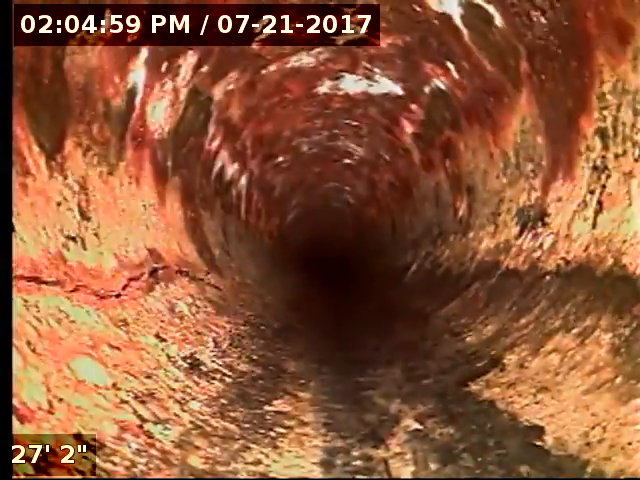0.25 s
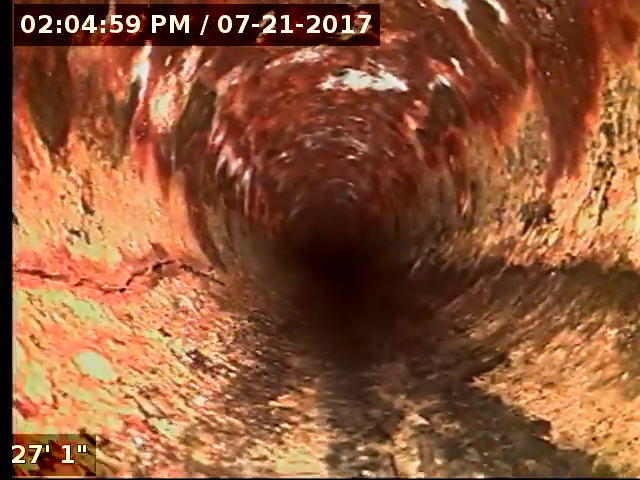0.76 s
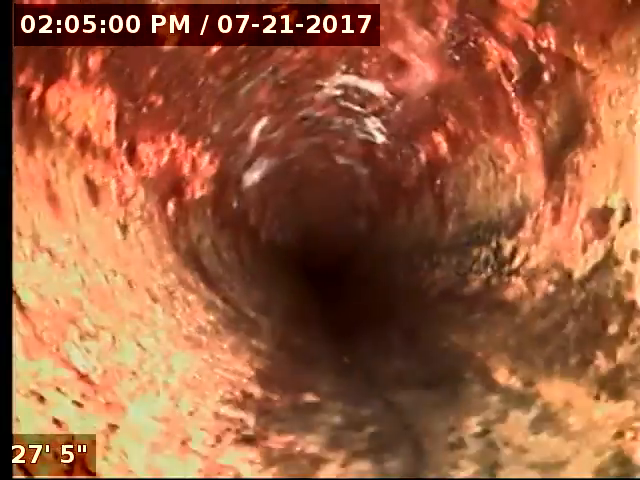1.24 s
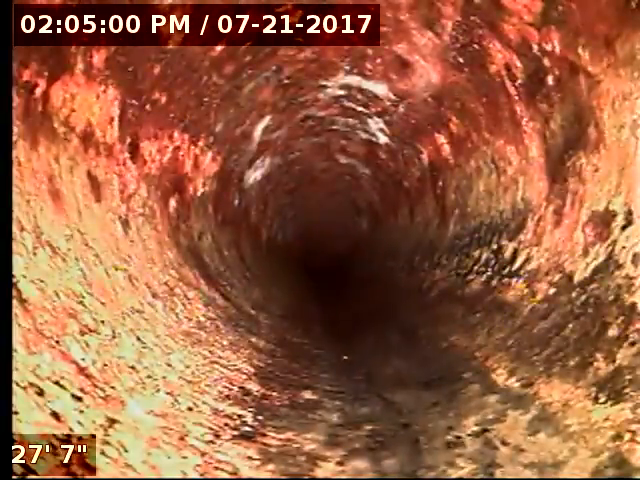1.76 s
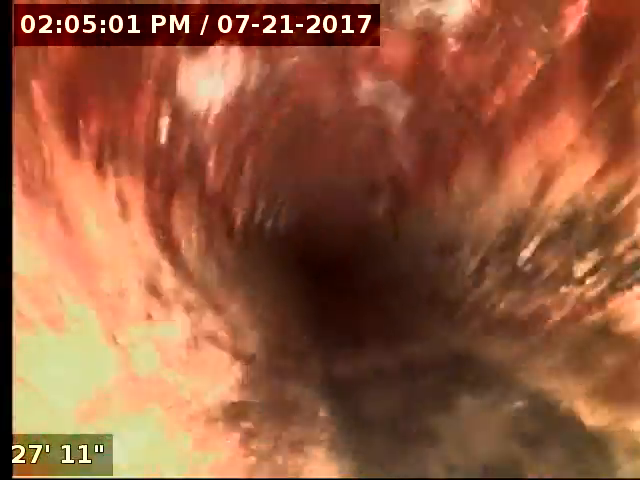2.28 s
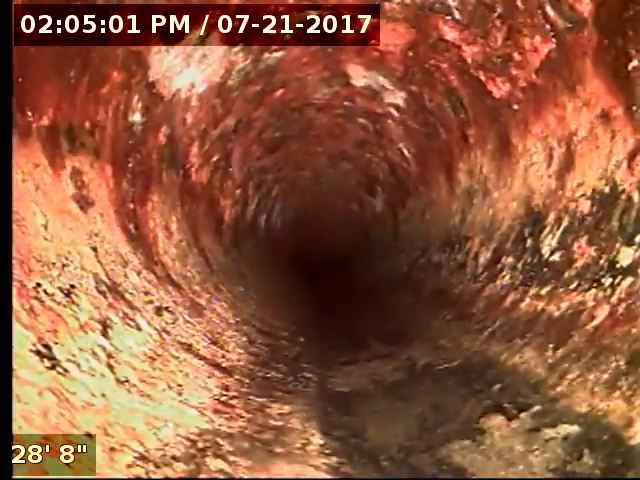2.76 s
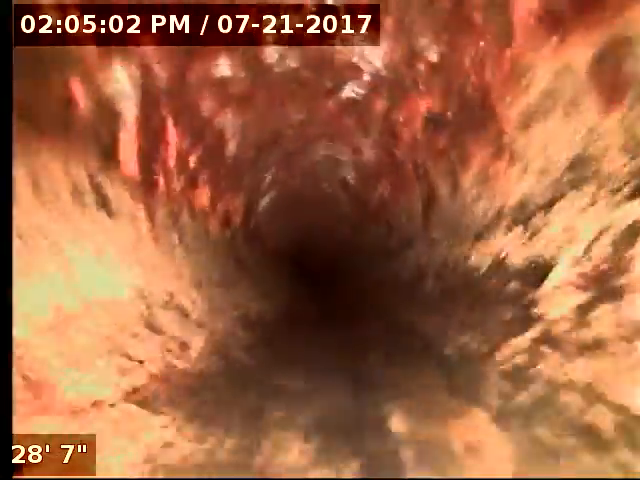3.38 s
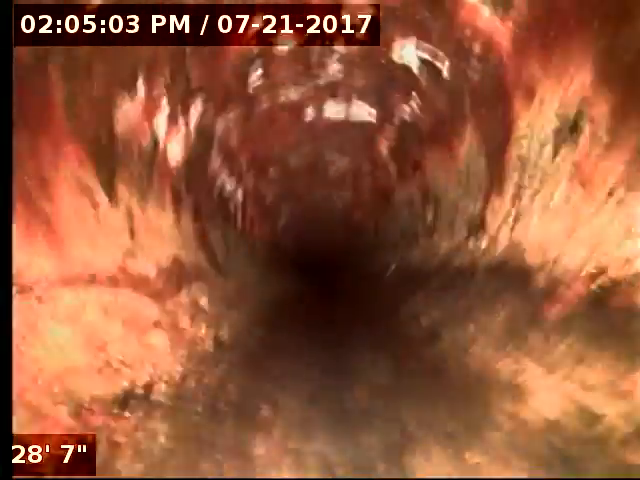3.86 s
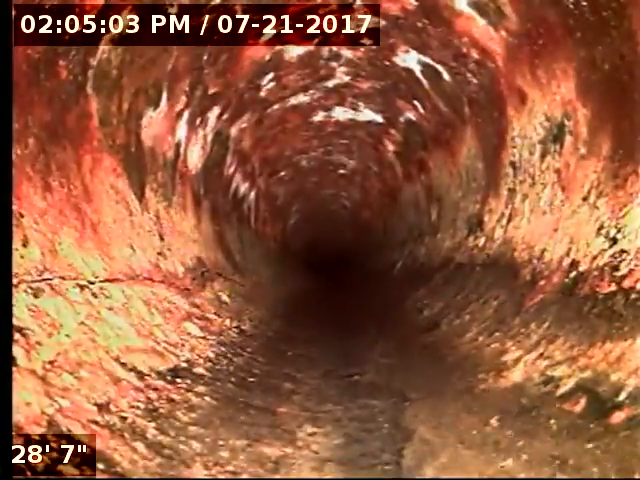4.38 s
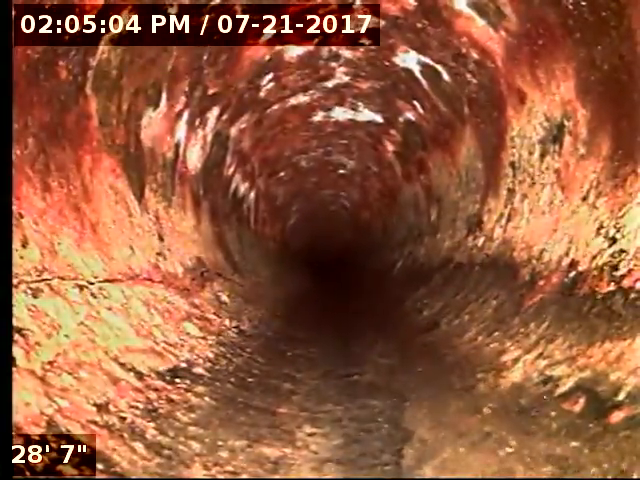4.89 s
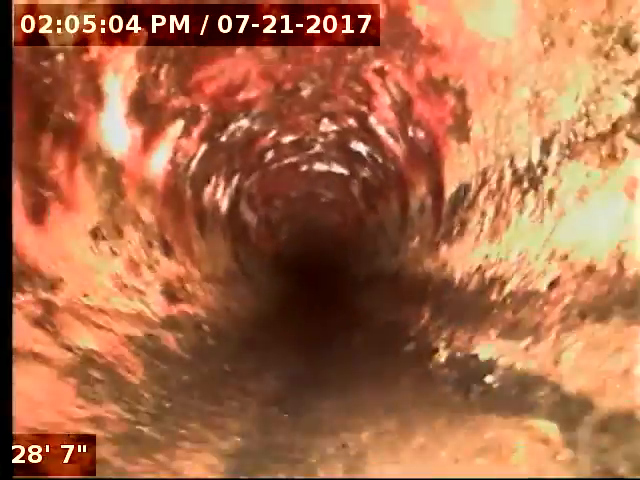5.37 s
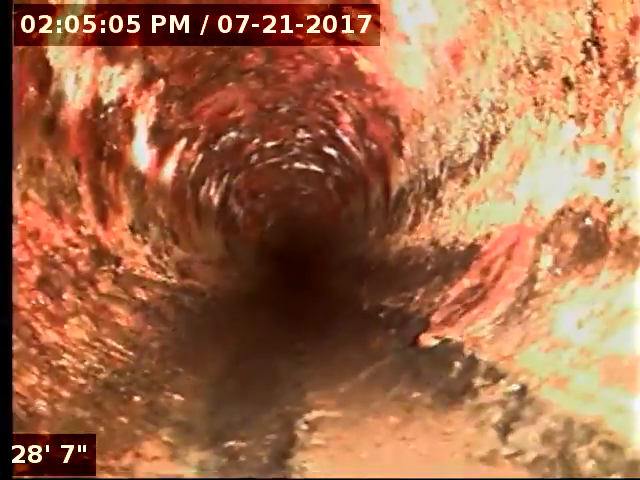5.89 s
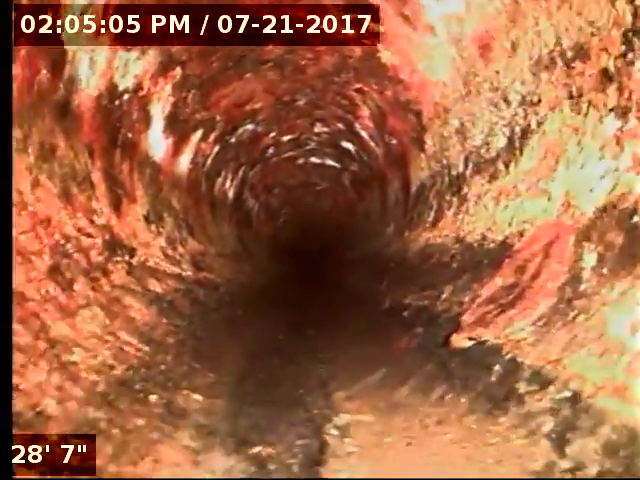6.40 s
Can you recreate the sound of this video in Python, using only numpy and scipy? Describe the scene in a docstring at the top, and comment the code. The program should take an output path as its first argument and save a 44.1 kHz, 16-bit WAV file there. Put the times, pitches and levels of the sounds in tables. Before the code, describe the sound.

A push cable is fed by hand into a drain, scraping, knocking and ticking in its reel over a faint hum.

```python
"""Feeding a push cable into a drain

At the drain, on the inspection unit's own small microphone, in mono. Pushed by hand, the cable scrapes,
knocks and chatters in its reel, thumps the frame, ticks on the wire cage and once snaps taut. Between
pushes a hand slides back along it with a soft hiss and hoarse squeaks. The unit's housing colours the
knocks and the friction; room air and a faint hum lie underneath."""
import sys
import numpy as np
from scipy import signal
from scipy.fft import rfft, irfft
from scipy.io import wavfile
from scipy.ndimage import uniform_filter1d

SR = 44100
rng = np.random.default_rng(int(sys.argv[2]) if len(sys.argv) > 2 else 0)


def materialize(psi):
    """Save the field psi as 16-bit PCM at rate SR to the path in sys.argv[1].

    A 1-D psi becomes a single channel; in a 2-D psi each row is a channel.
    """
    bounded = np.clip(np.atleast_2d(psi).T, -1, 1)
    quanta = np.round(bounded * 32767).astype(np.int16)
    wavfile.write(sys.argv[1], SR, quanta)


N = 292824
TIME, HIT_TIME = np.arange(N) / SR, np.arange(SR // 3) / SR
LEAD_S = .03  # room for the scuff ahead of a blow

# resonances of the housing around the microphone: (frequency [Hz], width [Hz], boost [dB])
HOUSING_MODES = [(204.6, 28, 18.5), (293, 30, -4), (402, 144, 8), (667, 200, 3.5), (776, 40, 7),
                 (869, 100, 5), (1142, 110, 6.5), (1460, 46, 7.5), (1723, 82, 11.5), (1970, 27, 2),
                 (2102, 130, 6), (2554, 42, 6)]
# tone of each source ahead of the housing: (frequency [Hz], relative level [dB])
AIR_SPECTRUM = [(25, -7), (60, -3.5), (120, 1.5), (200, 4), (300, 4), (520, -4), (800, -25), (1300, -6.5),
                (2000, -12.5), (3000, -15), (4500, -25.5), (7000, -20), (8000, -32.5), (8900, -54)]
SCRAPE_SPECTRUM = [(60, -33.5), (150, -3.5), (280, -8), (500, -12), (660, 1.5), (850, 0), (1000, -4),
                   (1400, -5), (1700, -14.5), (2800, -13.5), (3600, -31.5), (6000, -32.5), (9000, -55.5)]
KNOCK_BODY_SPECTRUM = [(40, -19), (150, -23.5), (300, -6), (480, -11), (660, 4), (850, -2.5), (1000, -2),
                       (1500, -3.5), (1900, -41), (3500, -42.5), (9000, -94.5)]
KNOCK_EDGE_SPECTRUM = [(300, -26.5), (1200, -5.5), (1900, 13), (2900, 6), (3500, -3.5), (5000, -17),
                       (7000, -15), (9000, -69.5)]
PALM_SPECTRUM = [(200, -23.5), (700, -11.5), (1600, 1.5), (2400, 6), (3200, 8), (3700, -0.5), (4600, -13),
                 (9000, -56.5)]
FIZZ_SPECTRUM = [(2500, -32), (4400, 4.5), (5200, 2), (5900, 4.5), (7000, 0), (7700, -6), (8800, -20.5),
                 (10000, -45)]
CAGE_SPECTRUM = [(300, 2.5), (1200, 4.5), (2000, 6), (2600, 8.5), (3050, -31.5), (3500, 1.5), (4500, -29),
                 (9000, -62.5)]
SNAP_SPECTRUM = [(30, -22), (200, 8.5), (500, -1), (900, 5.5), (1400, -12), (2400, -15), (3400, -31),
                 (6000, -60), (9000, -70)]
# tones of the unit's hum: (frequency [Hz], level [dB])
HUM_TONES = [(219, -63), (360.7, -68.5), (732, -87), (947.5, -69), (1130, -71.5)]
# pushes on the cable: (start [s], length [s], relative level [dB])
PUSHES = [(-0.05, 0.054, -40.5), (0.68, 0.21, -45.5), (0.864, 0.32, -41.5), (1.43, 0.06, -46),
          (1.966, 0.41, -43), (2.883, 0.45, -39), (3.559, 0.23, -43), (4.058, 0.042, -46),
          (5.128, 0.17, -46), (6.12, 0.051, -41.5), (6.36, 0.45, -47)]
# thumps of the frame: (time [s], level [dB], pitch [Hz], t60 [s])
FRAME_THUMPS = [(0.042, -40, 222, 0.18), (0.217, -41.5, 211.8, 0.3), (0.74, -31.5, 233, 0.072),
                (0.818, -36, 243, 0.17), (1.021, -39.5, 230, 0.12), (1.195, -28.5, 217, 0.15),
                (1.83, -23, 216, 0.17), (1.853, -29.5, 225, 0.11), (1.958, -37.5, 223, 0.18),
                (2.236, -35, 277, 0.13), (2.361, -27, 228, 0.15), (2.375, -33, 306, 0.05),
                (3.053, -33.5, 217.5, 0.23), (4.376, -37, 222, 0.26), (6.036, -55, 75, .12),
                (6.146, -43.5, 216.5, 0.41)]
# cable knocks on the reel:
# (time [s], relative level [dB], edge offset [dB], hollow pitch [Hz], chatter decay [s], scuff [0-1])
REEL_KNOCKS = [(0.078, -35.5, -14, 930, .006, 0.1), (0.296, -52, 10, 960, .003, 0.1),
               (0.634, -32, -7, 700, 0.02, 1), (0.731, -35.5, -9, 740, 0.0098, 0.5),
               (0.785, -30, -10.5, 835, 0.0047, 0.5), (0.820, -25, -16, 844, 0.0047, 0.26),
               (0.921, -32.5, -3.5, 790, 0.0065, 1), (1.191, -25.5, -16.5, 970, 0.0026, 0.05),
               (1.551, -38, -1, 715, 0.004, 1), (1.777, -31.5, -16.5, 820, 0.018, 0.8),
               (1.8245, -24, -5.5, 2190, 0.0012, 0.83), (1.83, -18, -19, 790, .0022, 0.7),
               (1.865, -33.5, -14, 820, 0.042, 1), (2.115, -25, -26, 717, 0.014, 0.3),
               (2.356, -29.5, 9.5, 1020, 0.0034, 0.1), (2.361, -24.5, -29, 885, 0.012, 1),
               (2.882, -30.5, -14, 853, 0.0065, 0.26), (3.029, -37, 5.5, 700, 0.002, 1),
               (3.051, -20, -7.5, 810, 0.0059, 0), (3.058, -24.5, -10, 787, 0.007, 0),
               (3.1255, -27.5, -16, 790, 0.0036, 0.2), (3.148, -29.5, -31, 676, .0085, .5),
               (3.357, -26.5, -14, 707, 0.0026, 1), (3.492, -24.5, -16.5, 690, 0.0018, 0.04),
               (4.112, -29.5, -19, 785, 0.0061, 0.96), (4.148, -31, -25, 875, .018, 1),
               (4.361, -25, -4.5, 812, 0.012, 0.34), (4.928, -34, 1.5, 1780, 0.0086, 0.47),
               (5.038, -24.5, -15, 670, 0.0043, 0.02), (5.046, -27.5, -15.5, 695, 0.011, 0.5),
               (5.117, -22, -34, 730, .002, 1), (5.149, -35, -9.5, 750, 0.0086, 1),
               (5.305, -26.5, -21, 750, 0.0016, 0.1), (6.1463, -23, -15, 810, 0.0026, 0),
               (6.15, -28, -4.5, 1500, 0.0027, 0.17), (6.194, -24.5, -16.5, 780, 0.0049, 0.96),
               (6.228, -36, -22, 770, 0.0034, 0.05)]
# squeaks of the cable's jacket: (middle [s], length [s], level [dB], pitch [Hz], glide [Hz/s])
GRIP_SQUEAKS = [(0.19, 0.13, -55, 2870, 0), (0.35, 0.23, -49, 3450, 4004), (1.08, 0.15, -54, 2400, -3),
                (1.456, 0.23, -56, 3110, -1500), (1.607, .16, -52, 2130, -2000),
                (2.276, 0.08, -51.5, 2560, 3), (2.616, 0.23, -54.5, 3080, -500),
                (4.65, 0.17, -53, 3460, -2000), (4.759, 0.17, -48, 2990, -7000),
                (4.805, 0.2, -51, 1800, -1500)]
# hand strokes along the cable: (start [s], fastest [s], end [s], relative rasp [dB], relative hiss [dB])
HAND_SLIDES = [(0.203, 0.4, 0.63, -47.5, -58.5), (0.86, 1.06, 1.47, -56.5, -83.5),
               (1.3, 1.56, 1.75, -48, -63.5), (2.446, 2.614, 2.954, -50, -71),
               (4.42, 4.702, 4.845, -50.5, -55)]
# thin upper resonances of the sliding grip: (frequency [Hz], width [Hz], relative level [dB])
GRIP_WHISPERS = [(5090, 540, -3.5), (6600, 810, -3.5), (7350, 710, -6.5)]
# ticks on the wire cage: (time [s], level [dB], treble offset [dB], base t60 [s])
CAGE_TICKS = [(0.921, -44, -26, 0.16), (1.19, -48, -4, 0.038), (2.113, -29.5, -17, 0.13),
              (2.357, -20.5, -7, 0.0074), (3.026, -36.5, -15.5, 0.13), (3.052, -36.5, -21, 0.14),
              (3.142, -43.5, -23, 0.22), (3.352, -42, -31, 0.12), (4.36, -41, -17.5, 0.26),
              (4.922, -48, -29, 0.36), (5.109, -34.5, -16, 0.16), (5.299, -43, -20, 0.14)]
# ringing modes of the cage: (frequency [Hz], relative level [dB], ring time [x base t60])
CAGE_MODES = [(1834, 1.5, 2), (2100, 3.5, 0.95), (2450, 2, 1.3), (2830, 4.5, 1.45), (3025, 2.5, 1.6),
              (3096, 4.5, 1.32), (3170, -0.5, 1.5), (5260, -15.5, 1.4), (6470, -14.5, 1.2)]
# pings of a single cage wire: (time [s], level [dB])
WIRE_PINGS = [(1.187, -59.5), (2.357, -49)]
# modes of that wire: (frequency [Hz], relative level [dB], t60 [s])
WIRE_MODES = [(7060, 0, 0.21), (7220, -12, 0.29), (7400, -2, .08)]


def amp(db):
    """Decibels to gain."""
    return 10 ** (np.asarray(db) / 20)


def unit(x):
    """Scales to rms 1."""
    return x / np.sqrt(np.mean(x ** 2) + 1e-20)


def unit_hit(x, size=220):
    """Scales the loudest few milliseconds to rms 1."""
    return x / np.sqrt(uniform_filter1d(x ** 2, size).max() + 1e-20)


def add(mix, s, sound):
    """Mixes a sound in at time s."""
    part = mix[max(round(s * SR), 0):][:len(sound)]
    part += sound[:len(part)]


def drift(rate_hz):
    """Slow random wander of rms 1."""
    hz = np.fft.rfftfreq(N, 1 / SR)
    return unit(irfft(rfft(rng.standard_normal(N)) / (1 + (hz / rate_hz) ** 2) ** 2, N))


def colour(x, spectrum, ring=1, peaks=(), size=8192):
    """Causal filter: a smooth spectrum plus the housing's resonances and further peaks, scaled by ring."""
    hz = abs(np.fft.fftfreq(size, 1 / SR))
    corner_hz, corner_db = np.transpose(spectrum)
    shape_db = np.interp(np.log(hz + 1), np.log(corner_hz), corner_db)
    shape_db += ring * sum(db / (1 + (2 * (hz - f) / width) ** 2)
                           for f, width, db in [*HOUSING_MODES, *peaks])
    minimum_phase = np.exp(np.conj(signal.hilbert(np.log(amp(shape_db)))))
    response = np.fft.ifft(minimum_phase).real
    return signal.fftconvolve(x, response[:size // 2])[:len(x)]


def resonate(x, hz, width_hz):
    """A steep-sided resonance that follows the curve hz."""
    turn = np.exp(2j * np.pi * np.cumsum(hz) / SR)
    r = np.exp(-np.pi * np.sqrt(2) * width_hz / SR)
    return 2 * (turn * signal.lfilter([(1 - r) ** 2], [1, -2 * r, r ** 2], x / turn)).real


def room_tone(air_db=-54, waver_db=5.0, wander_rad=0.94):
    """Room air drones in the housing over the unit's faint, wavering hum."""
    air = amp(air_db) * unit(colour(rng.standard_normal(N), AIR_SPECTRUM, ring=0.45))
    hum = np.zeros(N)
    for hz, db in HUM_TONES:
        gain = amp(db + waver_db * drift(rate_hz=8.3))
        hum += gain * unit(np.sin(2 * np.pi * hz * TIME + wander_rad * drift(rate_hz=0.71)))
    return air + hum


def grains(per_s, spread_db):
    """Tiny random slips of uneven size."""
    size = amp(spread_db * np.minimum(rng.exponential(1, N), 4))
    return unit(size * rng.standard_normal(N) * (rng.random(N) < per_s / SR))


def push(start, length, attack_s=0.064, sag_db_per_s=10.5, coast_db_per_s=49.5):
    """Gain of one push: it gets the cable up to speed, tires a little, then lets the reel coast."""
    t = np.maximum(TIME - start, 0)
    coasting_s = np.maximum(t - length, 0)
    return np.minimum(t / attack_s, 1) * amp(-sag_db_per_s * t - coast_db_per_s * coasting_s)


def hand_speed(start, fastest, end):
    """One stroke, 0-1: the hand speeds up and slows down in a smooth arch."""
    return np.sin(np.pi / 2 * np.interp(TIME, [start, fastest, end], [0, 1, 0]))


def cable_scrape(trim_db=-1, creep_db=-52.5, drag_db=-4.5):
    """Small slips of the cable shake the reel: strongly in a push, faintly under the sliding hand."""
    slips = grains(per_s=4000, spread_db=1.5) * amp(1.4 * drift(rate_hz=35))
    power = amp(creep_db) ** 2  # the cable never quite stops rubbing
    power += sum((amp(db) * push(start, length)) ** 2 for start, length, db in PUSHES)
    power += sum((amp(db + drag_db) * hand_speed(start, fastest, end)) ** 2
                 for start, fastest, end, db, _ in HAND_SLIDES)
    return amp(trim_db) * np.sqrt(power) * unit(colour(slips, SCRAPE_SPECTRUM, ring=0.8))


def frame_thumps(rise_s=0.003):
    """The frame booms in a few low modes; the cable's load shifts their pitch."""
    modes = [(1, 3.5), (1.31, -5), (1.95, -2.5)]  # (frequency [x pitch], relative level [dB])
    out, t = np.zeros(N), HIT_TIME
    for s, db, hz, t60 in FRAME_THUMPS:
        boom = sum(amp(level - 60 * t * ratio / t60) * np.sin(2 * np.pi * hz * ratio * t)
                   for ratio, level in modes)
        add(out, s, amp(db) * unit_hit(boom * (1 - np.exp(-t / rise_s))))
    return out


def contact(chatter_s, scuff, chatter=1.61, rattle=0.11, rattle_s=0.035, scuff_s=.007):
    """Force of one blow: the cable scuffs as it closes in, strikes at LEAD_S, chatters and rattles."""
    t = HIT_TIME - LEAD_S
    force = signal.unit_impulse(len(t), round(LEAD_S * SR))
    stages = (scuff, scuff_s, t < 0), (chatter, chatter_s, t >= 0), (rattle, rattle_s, t >= 0)
    for share, fade_s, when in stages:
        burst = when * rng.standard_normal(len(t)) * np.exp(-abs(t) / fade_s)
        force += share * burst / np.linalg.norm(burst)
    return force


def reel_knocks(body_db=-4, edge_db=-5, hollow_width_hz=170, hollow_db=8):
    """The cable strikes the reel: a hollow body, pitched by where it lands, and a harder upper edge."""
    out = np.zeros(N)
    for s, db, edge_offset_db, hz, chatter_s, scuff in REEL_KNOCKS:
        force = contact(chatter_s, scuff)
        hollow = [(hz, hollow_width_hz, hollow_db)]
        body = amp(body_db) * unit_hit(colour(force, KNOCK_BODY_SPECTRUM, peaks=hollow))
        edge = amp(edge_db + edge_offset_db) * unit_hit(colour(force, KNOCK_EDGE_SPECTRUM, peaks=hollow))
        add(out, s - LEAD_S, amp(db) * (body + edge))
    return out


def grip_squeaks(width_hz=560, uneven_db=2.0):
    """Friction in a tight grip rings one broad, gliding resonance that swells and fades."""
    friction = rng.standard_normal(N) * amp(uneven_db * drift(rate_hz=60))
    out = np.zeros(N)
    for middle, length, db, hz, hz_per_s in GRIP_SQUEAKS:
        at = abs(TIME - middle) < length / 2
        t = TIME[at] - middle
        squeak = unit(resonate(friction[at], hz + hz_per_s * t, width_hz))
        out[at] += amp(db) * np.cos(np.pi * t / length) * squeak
    return out


def hand_slides(palm_db=-4, fizz_db=-3, whisper_db=-7, glide=0.069, rasp_power=0.89, hiss_power=1.62):
    """Dense, fine friction of the hand on the cable's jacket; thin resonances sink as the hand travels."""
    friction = grains(per_s=9100, spread_db=-0.5) * amp(1.9 * drift(rate_hz=130))
    palm = unit(colour(friction, PALM_SPECTRUM))
    fizz = unit(colour(friction, FIZZ_SPECTRUM))
    out = np.zeros(N)
    for start, fastest, end, rasp_db, hiss_db in HAND_SLIDES:
        at = slice(round(start * SR), round(end * SR))
        speed = hand_speed(start, fastest, end)[at]
        sinking = np.linspace(1 + glide, 1 - glide, len(speed))
        hiss = amp(fizz_db) * fizz[at]
        for hz, width_hz, level in GRIP_WHISPERS:
            wobble = 1 + .02 * drift(rate_hz=15)[at]
            hiss += amp(whisper_db + level) * unit(resonate(fizz[at], hz * sinking * wobble, width_hz))
        out[at] += amp(palm_db + rasp_db) * palm[at] * speed ** rasp_power
        out[at] += amp(hiss_db) * hiss * speed ** hiss_power
    return out


def cage_ticks(sharpness=0.85, sharp_s=0.0016, rise_s=0.0021, mode_spread_db=4.5, ring_db=-5):
    """Struck by the cable, the wire cage jangles and leaves a short metallic ring."""
    out, t = np.zeros(N), HIT_TIME
    for s, db, treble_db, t60 in CAGE_TICKS:
        strike = rng.standard_normal(len(t)) * (1 + sharpness * np.exp(-t / sharp_s))
        decay_db = -60 * t / t60
        jangle = unit_hit(colour(strike * amp(decay_db / .7), CAGE_SPECTRUM, ring=.8))
        treble = unit_hit(colour(strike * amp(decay_db / .85), FIZZ_SPECTRUM))
        # many near-alike wires share each mode, so the ring beats roughly and varies from blow to blow
        ring = np.zeros(len(t))
        for hz, level, life in CAGE_MODES:
            mode = unit(resonate(strike, np.full(len(t), hz), width_hz=70))
            ring += amp(level + mode_spread_db * rng.standard_normal() + decay_db / life) * mode
        tick = jangle + amp(treble_db) * treble + amp(ring_db) * unit_hit(ring)
        add(out, s, amp(db) * tick * (1 - np.exp(-t / rise_s)))
    return out


def wire_pings():
    """One wire of the cage rings on in a few high, close modes."""
    out, t = np.zeros(N), HIT_TIME
    ping = sum(amp(level - 60 * t / t60) * np.sin(2 * np.pi * hz * t) for hz, level, t60 in WIRE_MODES)
    for s, db in WIRE_PINGS:
        add(out, s, amp(db) * ping)
    return out


def cable_snap(time_s=1.8272, peak_db=-6.5):
    """The cable snaps taut against the frame with one short, dull crack."""
    force = contact(chatter_s=.002, scuff=.1, chatter=.1, rattle=.05)
    crack = colour(force, SNAP_SPECTRUM, ring=.1)
    out = np.zeros(N)
    add(out, time_s - LEAD_S, amp(peak_db) * crack / abs(crack).max())
    return out


def scene():
    """All sources as they reach the unit's one microphone."""
    blows = reel_knocks() + cable_snap() + frame_thumps() + cage_ticks() + wire_pings()
    friction = cable_scrape() + hand_slides() + grip_squeaks()
    return (blows + friction + room_tone())[None]


def record(dry, notch_hz=4030, notch_width_hz=620, top_hz=8950):
    """The microphone's narrow-band channel: a deep notch in the treble and a steep top edge."""
    hz = np.fft.rfftfreq(N, 1 / SR)
    notch = (abs(hz - notch_hz) / np.hypot(hz - notch_hz, notch_width_hz)) ** 1.25
    notched = irfft(rfft(dry) * notch, N)
    lowpass = signal.firwin(511, top_hz, window=("kaiser", 9), fs=SR)
    return signal.oaconvolve(notched, lowpass[None], "same")


dry = scene()
out = record(dry)
materialize(out)
```